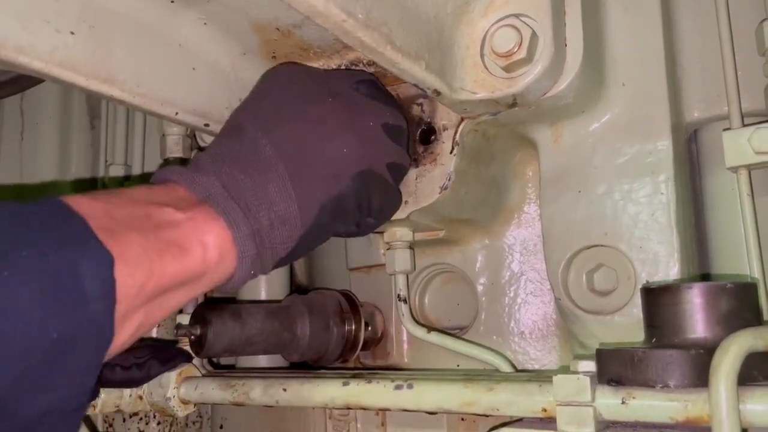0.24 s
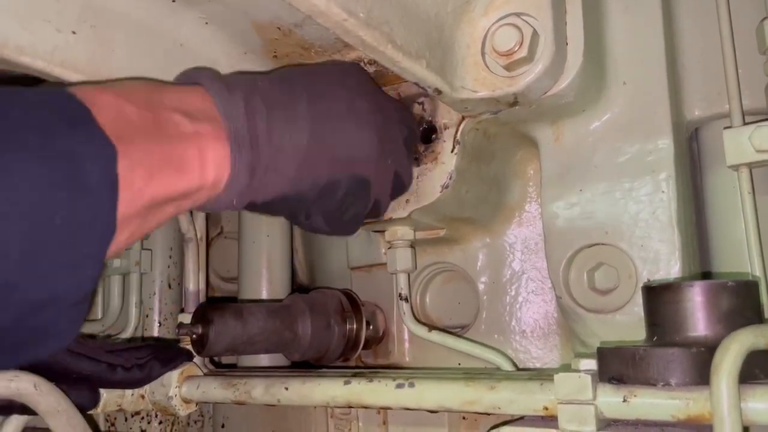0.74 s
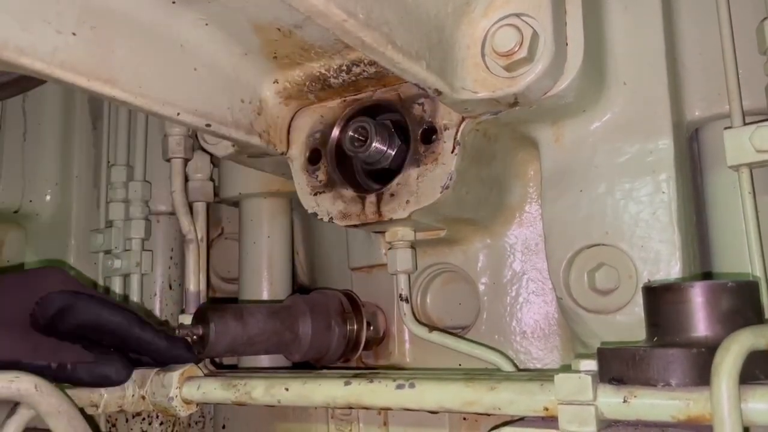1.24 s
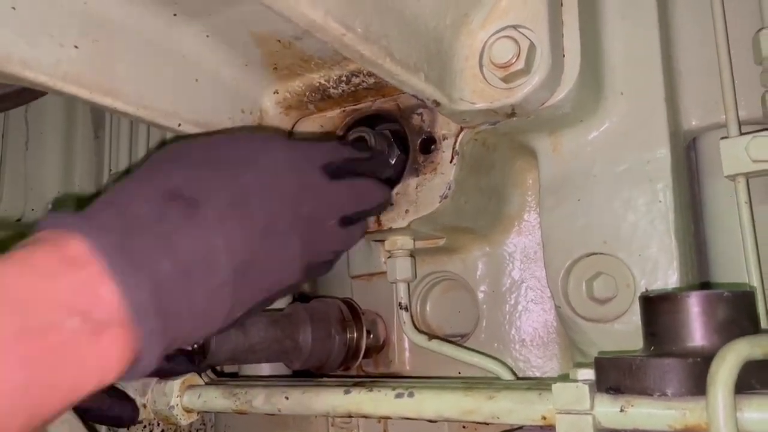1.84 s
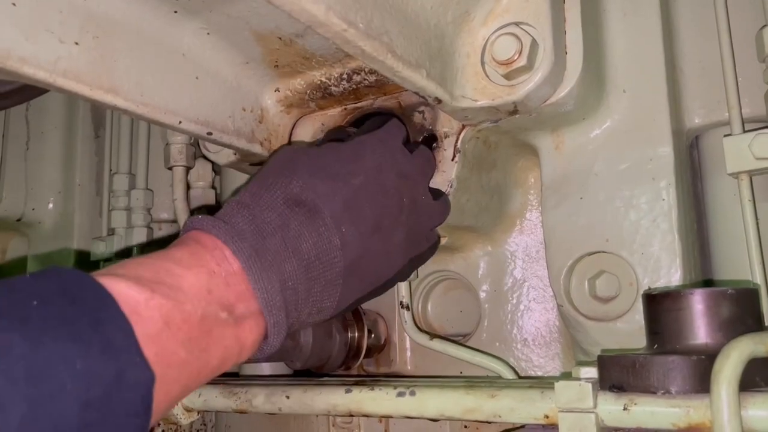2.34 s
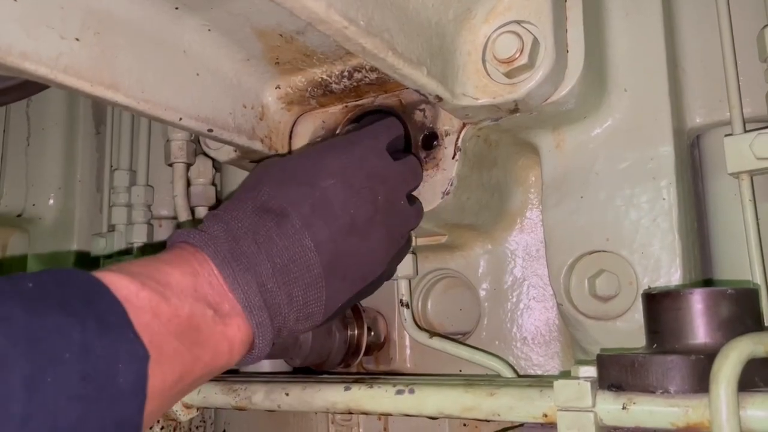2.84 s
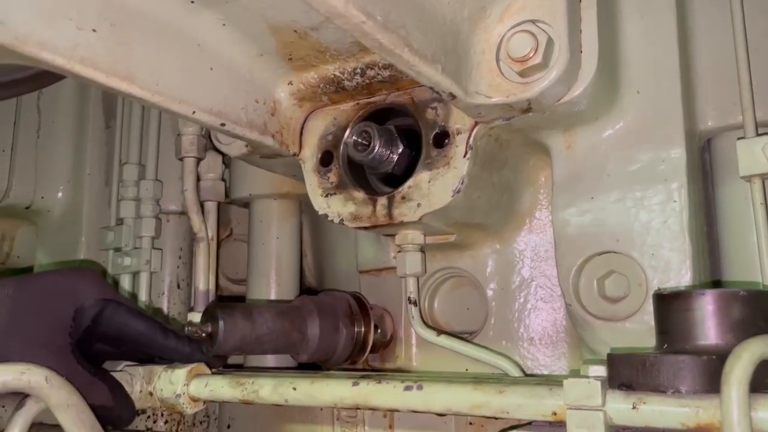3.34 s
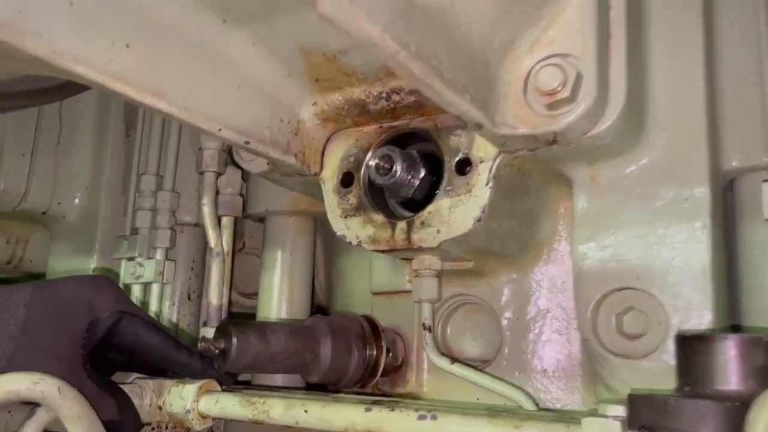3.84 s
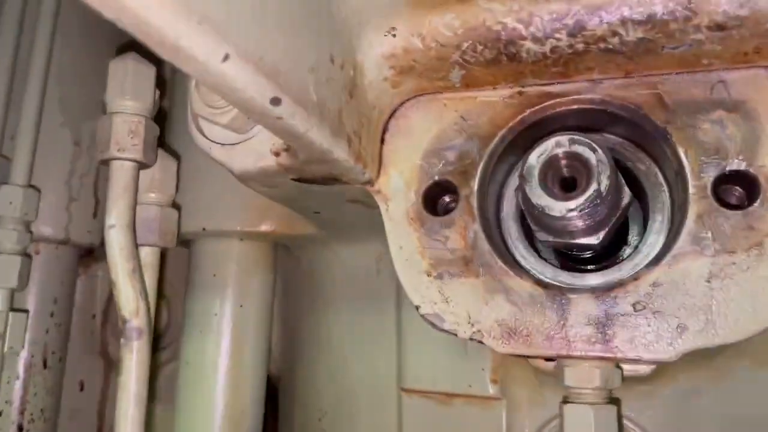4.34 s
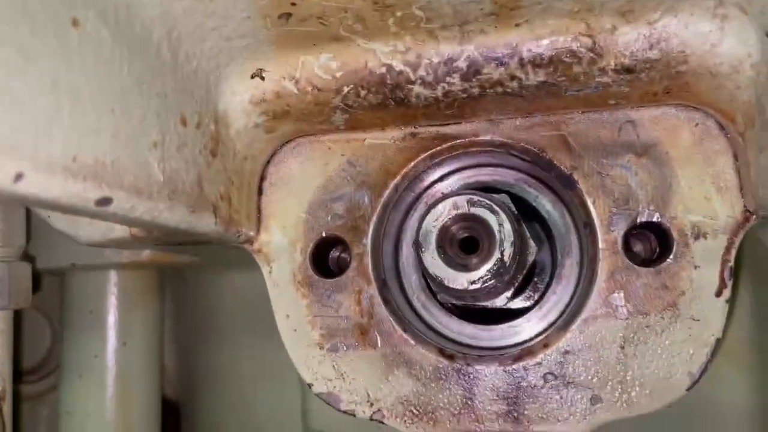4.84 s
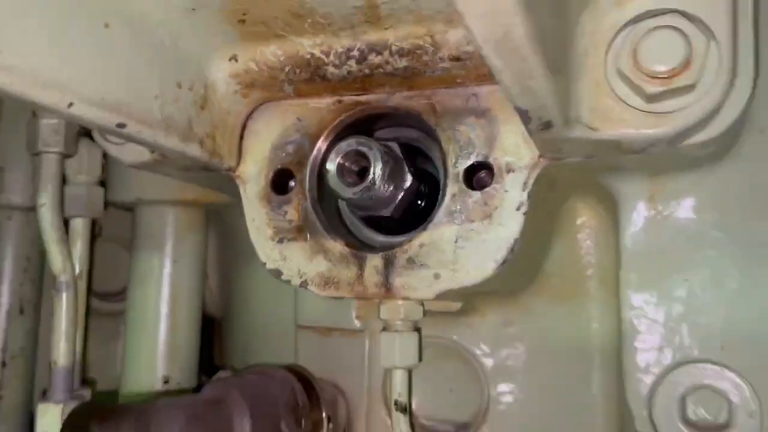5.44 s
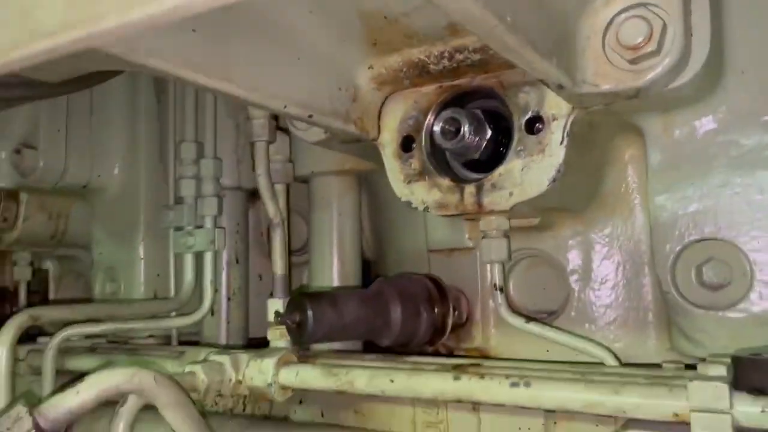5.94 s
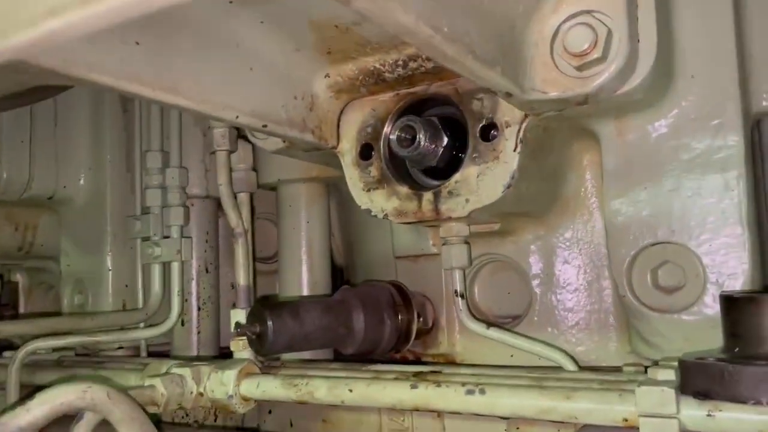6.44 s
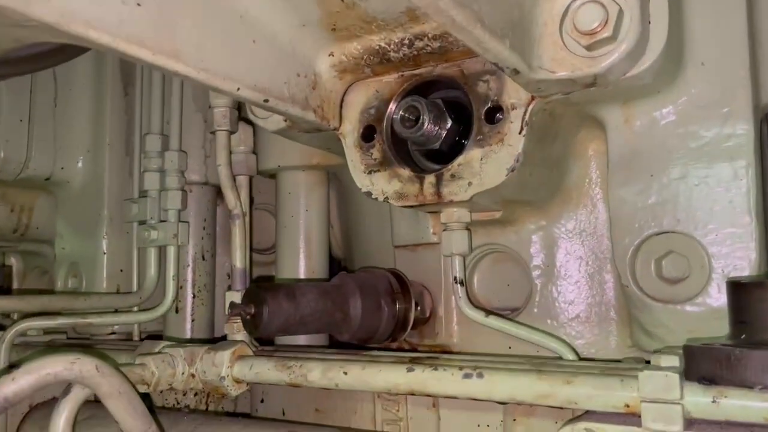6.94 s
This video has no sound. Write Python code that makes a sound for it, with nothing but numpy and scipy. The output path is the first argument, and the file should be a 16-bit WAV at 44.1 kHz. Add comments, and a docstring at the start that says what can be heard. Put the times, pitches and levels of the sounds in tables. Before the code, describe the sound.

Low machinery and ventilation drone with a thin electric whine; its colour shifts near a casing, then dry metallic knocks cluster close up.

```python
"""In a ship's engine room, a hand-held stereo recorder stands in ventilation and machinery roar: shaped noise.
An electric motor whines in steady, wavering sine tones. Close by, small metal parts are knocked and rattled:
sprays of tiny touches that ring the parts' modes. The recorder moves up to the engine casing, whose reflection
colours the roar, then draws back and turns away. Loud treble, as in the knocks, makes its gain control duck."""
import sys
import numpy as np
from scipy import signal
from scipy.fft import rfft, irfft
from scipy.io import wavfile
from scipy.ndimage import uniform_filter1d

SR = 44100
rng = np.random.default_rng(int(sys.argv[2]) if len(sys.argv) > 2 else 0)


def store_wav(level_fs):
    """Save 16-bit WAV to argv[1]."""
    pcm = np.round(np.clip(np.atleast_2d(level_fs), -1, 1) * 32767)
    wavfile.write(sys.argv[1], SR, pcm.T.astype(np.int16))


N = 317520   # length [samples]


def from_db(db):
    """Decibels to gain."""
    return 10 ** (np.asarray(db) / 20)


def at_hz(points, hz):
    """Read a (frequency [Hz], value) table on a log-frequency axis."""
    table_hz, values = np.array(points).T
    return np.interp(np.log(hz), np.log(table_hz), values)


def curve(rows):
    """Columns of a time table at every sample."""
    s, *columns = np.transpose(rows)
    return [np.interp(np.arange(N) / SR, s, column) for column in columns]


def ramp(start_s, takes_s):
    """Rises from 0 to 1 from a moment on."""
    return np.clip((np.arange(N) / SR - start_s) / takes_s, 0, 1)


def drift(rate_hz):
    """Random wander of spread 1: noise through two one-pole low-passes, run at every 40th sample."""
    step = 40
    r = np.exp(-2 * np.pi * rate_hz * step / SR)
    settle = 4000   # filter start-up, discarded
    noise = rng.standard_normal(N // step + settle + 2)
    slow = signal.lfilter([1], [1, -2 * r, r * r], noise)[settle:]
    return np.interp(np.arange(N) / step, np.arange(len(slow)), slow / slow.std())


def band(x, low_hz, high_hz):
    """Band-pass along the last axis."""
    return signal.sosfilt(signal.butter(2, [low_hz, high_hz], "band", fs=SR, output="sos"), x)


def vary_treble_bands(x):
    """Adds slow random level changes to narrow bands above 3.4 kHz."""
    spread_db, rate_hz = 2.0, 9.0
    hz, lines = np.arange(N // 2 + 1) * SR / N, rfft(x)
    edges = np.geomspace(3400, 12500, 19)
    out = x.copy()
    for low, high in zip(edges, edges[1:]):
        part = irfft(lines * ((hz >= low) & (hz < high)), N)
        out += (from_db(spread_db * drift(rate_hz)) - 1) * part
    return out


# Spectrum of the room's roar: (frequency [Hz], relative density [dB])
ROAR_SPECTRUM = [(15, -23), (22, -8), (34, -6), (62, -4), (88, -0.5), (181, -0.5), (228, -1.5), (255, -4),
                 (300, -6.5), (384, -13.5), (500, -19), (680, -13), (760, -13.5), (920, -17.5), (1200, -14),
                 (1500, -17.5), (3390, -27), (3770, -30), (5350, -31.5), (7500, -36), (10500, -37),
                 (11300, -44), (12000, -38), (14000, -90)]
# Resonances in the roar: (frequency [Hz], width [Hz], lift [dB])
ROAR_RESONANCES = [(43.2, 17, 4), (156, 76, 3.5), (184.7, 6, 1.5), (194.3, 5.8, 7.5), (277, 8.1, 5.5),
                   (514.5, 91, 10.5), (612, 7.6, 9), (825, 41, 8.5), (1078, 66, 10), (1620, 7.7, 9)]
# Likeness of the two microphone ports: (frequency [Hz], correlation [-1 to 1])
PORT_LIKENESS = [(25, .998), (42, .997), (60, 1), (130, 0.96), (270, 0.95), (550, 0.39), (800, 0.57),
                 (1100, 0.12), (1700, 0.06), (2800, 0.33), (6000, 0.2), (8500, 0.92), (12000, 0.94)]
# Balance of the ports: (frequency [Hz], left minus right [dB])
PORT_BALANCE = [(60, -1), (130, -2), (270, -6.5), (580, -1.5), (1240, -1), (2650, 0), (5670, -1),
                (12100, 0)]
# Lead of the left port, as the ports lie apart: (frequency [Hz], phase [rad])
PORT_LEAD = [(300, 0.13), (800, 0.15), (1100, 0.18), (1600, 0.31), (2800, 0.88), (7000, 1), (9000, 0.51)]
# Change of the roar's colour near the casing: (frequency [Hz], level [dB])
NEAR_COLOUR = [(40, -0.5), (100, -3), (200, 0), (400, 3), (700, -4), (900, 1), (980, 1), (1030, -5.5),
               (1100, -1.5), (1200, -8.5), (1400, 5), (1550, -4), (1800, -1.5), (2100, -1), (2450, -2),
               (2850, -1.5), (4000, 0), (8000, 0), (12000, 0)]
# Strength of the casing's reflection: (frequency [Hz], level [dB])
CASING_REFLECTION = [(350, -30), (650, -8), (900, -3), (1900, -3), (2500, -10), (4000, -30)]
# Detour of the reflection to the recorder: (time [s], path [m])
REFLECTION_DETOUR = [(3.9, .575), (4.2, .53), (4.5, .455), (4.85, .42), (5.1, .475), (5.4, .535),
                     (5.6, .58)]


def roar(near, change_db):
    """Diffuse stereo noise with resonances; near the casing a delayed reflection carves moving dips into it."""
    level_db, echo_waver_db = -36, 2.5
    hz = np.maximum(np.arange(N // 2 + 1) * SR / N, 1)
    left_right = np.array([[1], [-1]])

    shape_db = at_hz(ROAR_SPECTRUM, hz)
    for centre_hz, width_hz, lift_db in ROAR_RESONANCES:
        shape_db = shape_db + lift_db / (1 + (2 * (hz - centre_hz) / width_hz) ** 2)

    # shared and opposed noise set the likeness of the ports
    alike = np.clip(at_hz(PORT_LIKENESS, hz), -1, 1)
    mid, side = rfft(rng.standard_normal((2, N)))
    pair = np.sqrt(1 + alike) * mid + np.sqrt(1 - alike) * side * left_right
    pair = pair * from_db(shape_db + at_hz(PORT_BALANCE, hz) / 2 * left_right)
    pair[0] *= np.exp(1j * at_hz(PORT_LEAD, hz))

    near_pair = pair * from_db(at_hz(NEAR_COLOUR, hz))
    far, close = irfft(pair, N), irfft(near_pair, N)
    echo = irfft(near_pair * from_db(at_hz(CASING_REFLECTION, hz)), N)
    late = np.arange(N) - curve(REFLECTION_DETOUR)[0] / 343 * SR   # speed of sound 343 m/s
    echo = np.array([np.interp(late, np.arange(N), port) for port in echo])
    echo_gain = from_db(echo_waver_db * drift(3.6))   # comes and goes as the hand shakes
    blend = far + near * (close - far) + near * echo_gain * echo
    return from_db(level_db + change_db) * vary_treble_bands(blend) / far.mean(axis=0).std()


# Motor whine at multiples of the slot tone; the levels are at a distance, settled, before any change:
# (multiple, rms level [dB], left minus right [dB], left lead [rad], change before settling [dB],
#  change near the casing [dB], change once drawn back [dB])
SLOT_TONES = [(1, -65, 2, 4.1, -1, 9.5, -2), (2, -52, -5, 2.07, 3.5, 2, -2.5),
              (3, -65.5, -1, 2, -10, -2, -6), (4, -63.5, -7.5, 0.1, -1, -7, -3.5),
              (5, -62.5, -2, 1.37, -1.5, -8, -4), (6, -72.5, -6, 1, -3, 1.5, 1),
              (7, -66, 1, 0.11, -10, -19, -9), (8, -68.5, -2, 0.1, -4, -25, -13),
              (9, -67.5, 1, 0.11, -3, -4, -5), (10, -65, -3, 2.9, -1, -17, -2),
              (11, -79, 15, 0.46, 0, -7, -4), (12, -117, 2, 0.5, -3, -6, 1), (13, -88, 0, 0.5, 0, 8, 5),
              (14, -83, 0, 0.5, 0, 4, 5), (15, -84, 0, 0.5, 0, -2, 0), (16, -86, 0, 0.5, 0, 0, 0),
              (17, -88, -16, 0.5, 2, -14, -4), (18, -69.5, 2, 2.9, 2, -20, 6)]
# Further steady motor tones: (frequency [Hz], then the same columns as the slot tones)
SIDE_TONES = [(269.6, -47, -5, .1, 0, 0, 0), (819, -64, -2, .5, 0, 6.5, 0), (5658, -80, 0, 1, 0, -4, 0),
              (6013, -79, 0, 1, 0, 2, 0), (6968, -76, 0, 1.4, 0, -3, 0), (7324, -84, 0, 1, 0, 5, 0)]
# Course of the high motor tone before wavering: (time [s], rms level [dB])
HIGH_TONE_COURSE = [(0, -67), (1, -64.5), (2.4, -68), (3.7, -58), (4.1, -64.5), (4.9, -79), (5.8, -64),
                    (6.4, -63), (7.2, -61)]


def whine(near, drawn_back):
    """Sine tones of a motor; each wavers in level and phase as standing waves shift around the recorder."""
    slot_hz, high_tone_hz = 655.0, 5359.0
    waver_db, wander_db, sway_rad = 2.0, 1.0, .5
    back_lead = 0.38   # extra share of each tone's lead once drawn back
    t, out = np.arange(N) / SR, np.zeros((2, N))
    unsettled = 1 - ramp(1, 0.38)   # the hand settles into its stance
    side = 1 - near   # up close both ports hear the tone alike

    tones = [(multiple * slot_hz, *rest) for multiple, *rest in SLOT_TONES] + SIDE_TONES
    tones += [(high_tone_hz, curve(HIGH_TONE_COURSE)[0], -2, .3, 0, 0, 0)]
    for hz, db, pan_db, lead_rad, early_db, near_db, back_db in tones:
        phase = 2 * np.pi * (hz * t + rng.random()) + sway_rad * drift(0.86)
        place_db = early_db * unsettled + near_db * near + back_db * drawn_back
        moving_db = waver_db * drift(16.8) + wander_db * drift(0.93)
        peak = np.sqrt(2) * from_db(db + moving_db + place_db)   # rms to peak
        lead = lead_rad * (side + back_lead * drawn_back)
        out[0] += peak * from_db(side * pan_db / 2) * np.sin(phase + lead)
        out[1] += peak * from_db(-side * pan_db / 2) * np.sin(phase)
    return out


# Knocks close to the recorder, nominal levels ahead of its gain control; bands relative to 2-4 kHz:
# (time [s], peak level at 2-4 kHz [dB], below 2 kHz [dB], 4-7 kHz [dB], above 7 kHz [dB],
#  left minus right [dB], rattle decay [s], favoured mode [Hz])
KNOCKS = [(4.222, -37, -13, -7, -11, 1, 0.012, 2900), (4.535, -31.5, -1.5, -7, -13, 0, 0.019, 3280),
          (4.581, -40.5, 4, -10, -14, 0, .012, 3350), (4.631, -29.5, -3, -13, -19, -6, 0.014, 2830),
          (4.674, -39, 14.5, -11, -25, 0, 0.0083, 1500), (5.161, -43.5, 10, 1.5, -2, -2, 0.025, 7600),
          (5.291, -34, 5, -4, -7, 4, 0.0036, 4750), (5.298, -39, 0, -1, 1, -3, 0.026, 7600),
          (5.346, -44, -4, -1, 0, 0, 0.0088, 7600), (5.541, -26, -6, -10, -5, -2, 0.009, 2300),
          (5.55, -34, 2.5, -5, -13, 2, 0.034, 4800), (5.659, -28, 3.5, -10, -4, -4, 0.015, 1380),
          (5.679, -26.5, 2.5, -2.5, -11, 0, 0.017, 5350), (5.738, -29, -4, -7, -13, 2, 0.0091, 5270),
          (5.775, -36, 4, -10, -10, 1, 0.0092, 2800), (5.795, -28, -1, -17, -19, 1, 0.0054, 2750),
          (5.921, -36, 8.5, -13, -16, 2, 0.01, 2780), (5.996, -43, 2, -6, -1, 0, 0.014, 2700),
          (6.015, -27, -7, -8, -5, -2, 0.02, 6500), (6.027, -33, 8, -5, -4, 12, 0.011, 2400),
          (6.144, -47, 12, 2, -3, -1, 0.014, 1670), (6.238, -24.5, -0.5, -4, -5.5, 0, 0.0085, 4850),
          (6.246, -31, -10, -16, -12, 0.5, 0.043, 2830), (6.304, -52, -4, -12, -14, 2, 0.031, 2830),
          (6.345, -30.5, 0.5, -6.5, -6, 0, 0.049, 7620), (6.373, -29, -2, -6.5, -8, -10, 0.026, 7620),
          (6.377, -32.5, -3, -9, -1.5, 8, 0.038, 11250), (6.506, -40, -6, -2, 13, 0, 0.0071, 9450),
          (6.778, -36, -20, 10.5, 12, 1, 0.0059, 4400), (6.963, -37, -4, -6, 3.5, -3, 0.0083, 6550),
          (7.006, -31, 1, -4, 1, 6, 0.0083, 2700), (7.0923, -29, -5, -3.5, 5, 3, 0.0058, 6650),
          (7.111, -51, -2, 1, 9, 0, 0.024, 10600), (7.137, -47, -26, -27, -30, 9, 0.01, 3350)]
# Modes of the knocked parts, before chance: (frequency [Hz], relative level [dB], 60 dB decay [s])
PART_MODES = [(1150, -2, .025), (1360, 0, .025), (1500, -3, .03), (1680, 0, .025), (2000, -2, .022),
              (2380, -1, .022), (2830, 1, .035), (3350, 0, .022), (4000, -2, .015), (4780, 0, .015),
              (5280, 0, .018), (6000, -3, .012), (6550, 2, .012), (6950, 0, .012), (7630, 1, .02),
              (9450, 0, .009), (10600, 0, .009), (11250, 0, .015)]


def ring_parts(spray, ring_db, favoured_hz):
    """The touches and the modes they ring as resonators; strengths and pitches vary by knock."""
    spread_db, detune, favour_db = 3, .015, 9.5
    sound = spray.copy()
    chance = rng.standard_normal((len(PART_MODES), 2))
    for (hz, mode_db, ring_s), (luck, grip) in zip(PART_MODES, chance):
        r = from_db(-60 / (ring_s * SR))
        w = 2 * np.pi * hz * (1 + detune * grip) / SR
        favour = np.exp(-(np.log(hz / favoured_hz) / .05) ** 2)
        gain = from_db(mode_db + ring_db + spread_db * luck + favour_db * favour)
        # the tiny offset keeps the filter out of denormal numbers
        sound += signal.lfilter([gain, 0, -gain], [1, -2 * r * np.cos(w), r * r], spray + 1e-18)
    return sound


def knocks(touches_per_s, ring_db, alike, rise_s, tail_s, thump_db):
    """A knock is a short spray of tiny touches: a broad crack, the parts' modes, a dull push and a tail."""
    grain, first_touch = .75, 2.5   # unevenness of touches; size of the firm contact ending the build-up
    tail_db, treble_loss = -21, .6   # tail under the rattle; extra nepers lost over the rattle decay
    crest = 3.5   # nominal peak of a rattle over its rms
    lags = (1, 8)   # the right port hears shared touches by two paths [samples late]
    out, size = np.zeros((2, N)), SR // 4
    t, share = np.arange(size) / SR, np.clip(alike, 0, 1)
    left_right = np.array([[1], [-1]])

    for s, db, low_db, upper_db, top_db, pan_db, length, favoured_hz in KNOCKS:
        # one row common to both ports, then one row for each
        touch = rng.standard_normal((3, size)) * rng.exponential(1, (3, size)) ** grain
        touch *= rng.random((3, size)) < touches_per_s / SR
        touch[:, round(rise_s * SR)] = first_touch * rng.choice([-1, 1], 3)
        right = sum(np.roll(touch[0], lag) for lag in lags) / np.sqrt(2)
        spray = share * np.array([touch[0], right]) + (1 - share) * touch[1:]
        shape = np.exp(-t / max(length, .002)) + from_db(tail_db - 60 * t / tail_s)
        spray = spray * shape * np.minimum(t / rise_s, 1)

        sound = ring_parts(spray, ring_db, favoured_hz)
        edges = ((600, 2000), (2000, 4000), (4000, 7000), (7000, 12300))
        parts = [band(sound, *edge) for edge in edges]
        parts[2:] = [part * np.exp(-treble_loss * t / length) for part in parts[2:]]
        # alternate signs keep the band crossings filled
        gains = from_db([low_db, 0, upper_db, top_db]) * [1, -1, 1, -1]
        mix = np.zeros((2, size))
        for gain, part in zip(gains, parts):
            rms = np.sqrt(np.sum(part ** 2) / (2 * length * SR))
            mix += gain * part / (crest * rms)
        # the push on the casing
        mix -= from_db(thump_db) * np.sin(2 * np.pi * 80.0 * t) * np.exp(-t / 0.012)

        at = round(s * SR)
        out[:, at:at + size] += (from_db(db + pan_db / 2 * left_right) * mix)[:, :N - at]
    return out


def scene():
    """The recorder moves up to the casing, stays, draws back and turns away from the roar."""
    drawn_back = ramp(5.41, 0.3)
    near = ramp(3.91, 0.23) - drawn_back
    away = ramp(5.62, 1)
    near_roar_db, turn_db = 1, -3
    background = roar(near, near_roar_db * near + turn_db * away)
    motor = from_db(turn_db * away) * whine(near, drawn_back)
    # alike: share of the touches common to both ports
    hits = knocks(touches_per_s=3500.0, ring_db=-34, alike=.5, rise_s=.0018, tail_s=0.23, thump_db=-13.0)
    return background + motor + hits


def gain_control(x, start_db, slope, window_s, release_db_s, smooth_s):
    """Treble level above a threshold pulls the gain down; it climbs back at a steady rate, smoothed."""
    power = uniform_filter1d(np.mean(band(x, 1500, 11000) ** 2, axis=0), int(window_s * SR))
    cut_db = slope * np.maximum(10 * np.log10(power + 1e-12) - start_db, 0)
    release_db = release_db_s * np.arange(N) / SR
    held_db = np.maximum.accumulate(cut_db + release_db) - release_db
    r = np.exp(-1 / (smooth_s * SR))
    smooth_cut_db = signal.lfilter([(1 - r) ** 2], [1, -2 * r, r * r], held_db)
    # the deepest rumble is not ducked
    deep = signal.sosfilt(signal.butter(1, 50.0, fs=SR, output="sos"), x)
    return deep + (x - deep) * from_db(-smooth_cut_db)


def record(dry):
    """The recorder's gain control, rounding of peaks, then a steep cut of the top."""
    wet = gain_control(dry, start_db=-38.5, slope=0.99, window_s=0.0048, release_db_s=85.0, smooth_s=.018)
    ceiling = .13
    wet = ceiling * np.tanh(wet / ceiling)
    return signal.sosfilt(signal.cheby2(12, 70, 13000, fs=SR, output="sos"), wet)   # 70 dB down from 13 kHz


dry = scene()
out = record(dry)
store_wav(out)
```